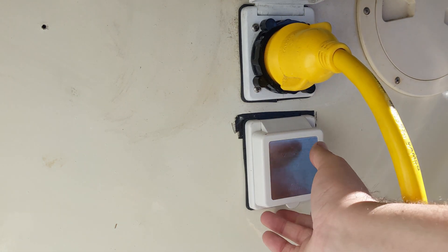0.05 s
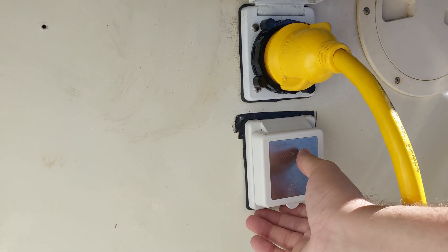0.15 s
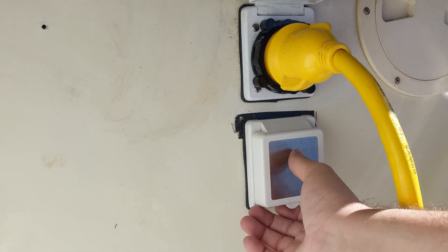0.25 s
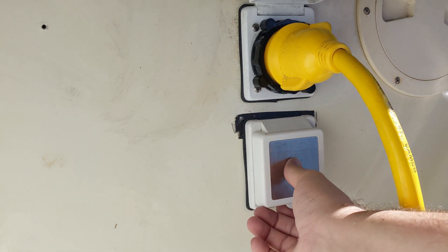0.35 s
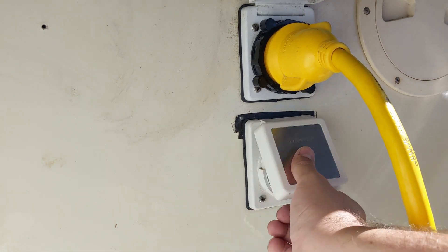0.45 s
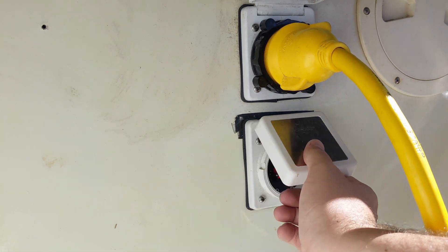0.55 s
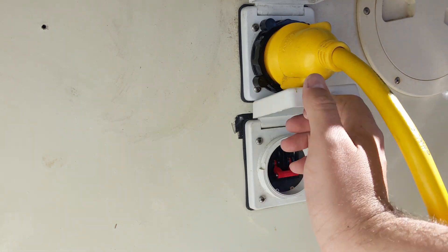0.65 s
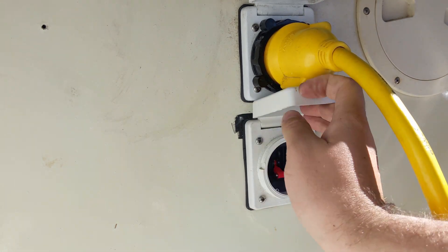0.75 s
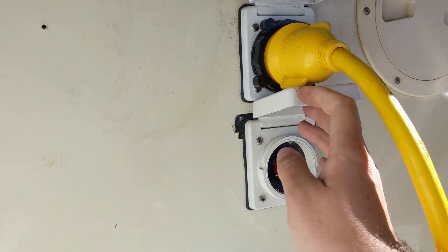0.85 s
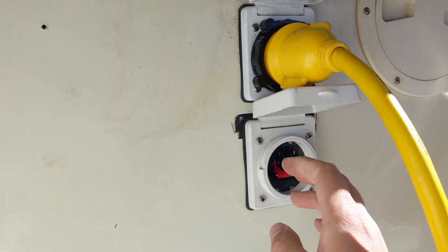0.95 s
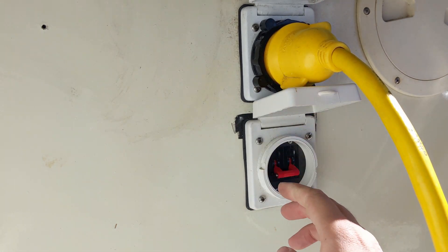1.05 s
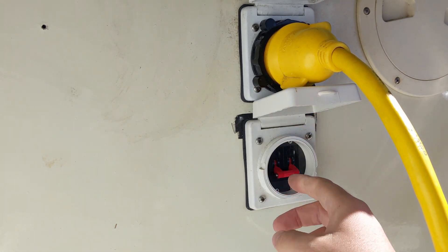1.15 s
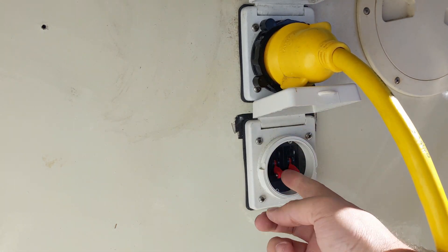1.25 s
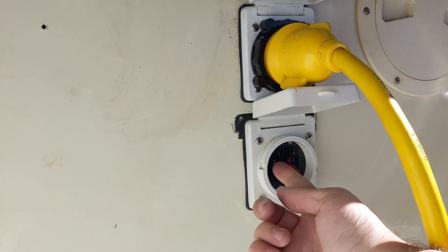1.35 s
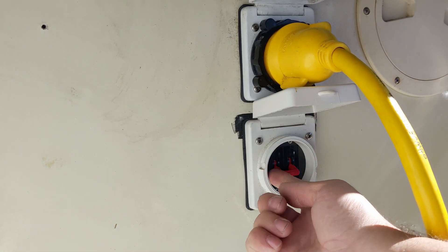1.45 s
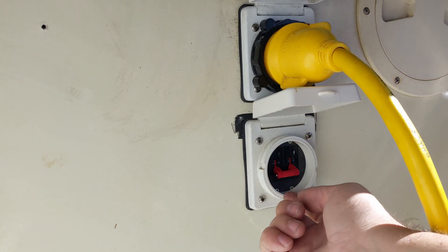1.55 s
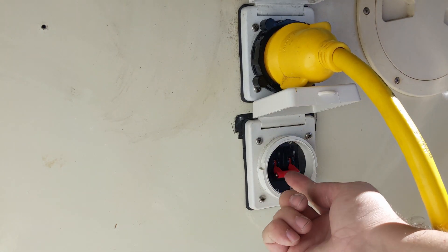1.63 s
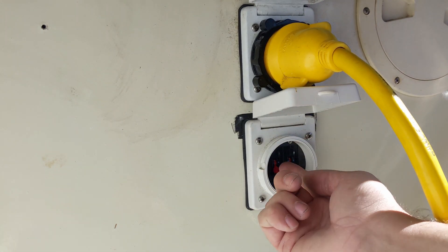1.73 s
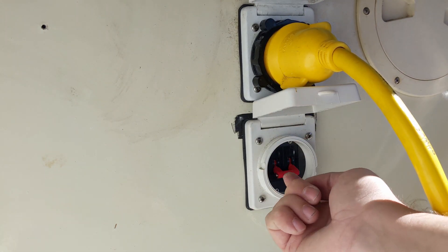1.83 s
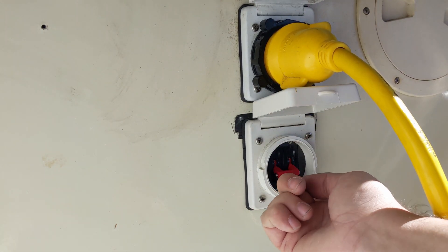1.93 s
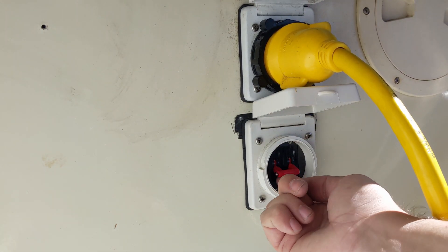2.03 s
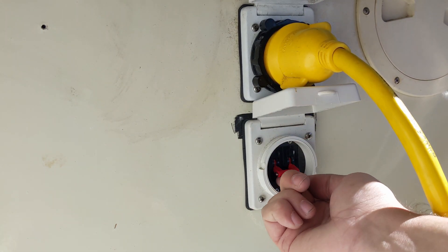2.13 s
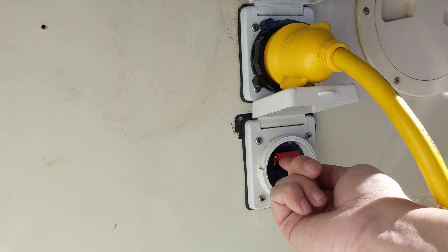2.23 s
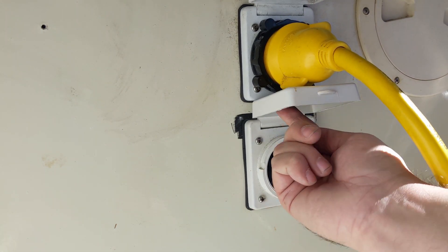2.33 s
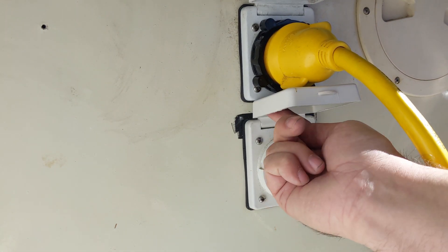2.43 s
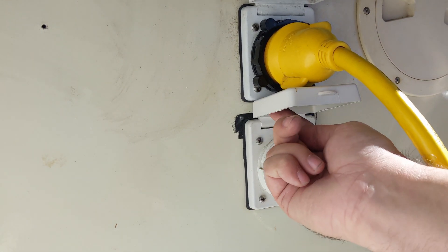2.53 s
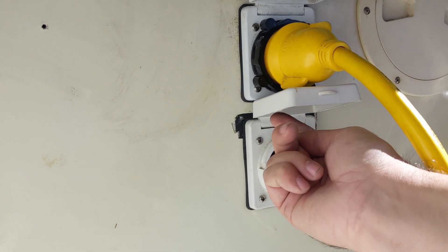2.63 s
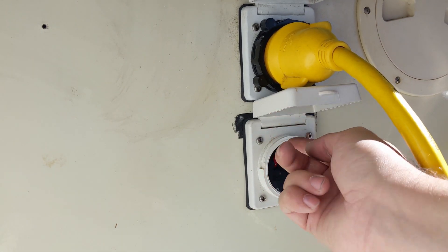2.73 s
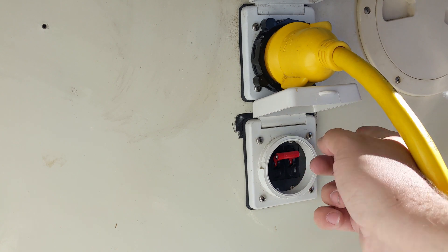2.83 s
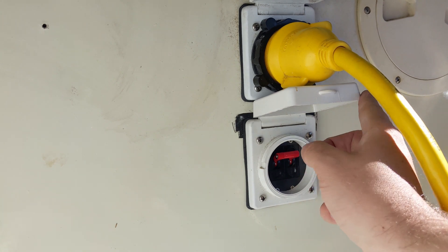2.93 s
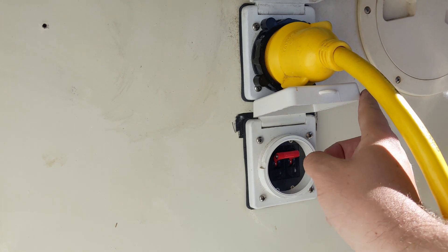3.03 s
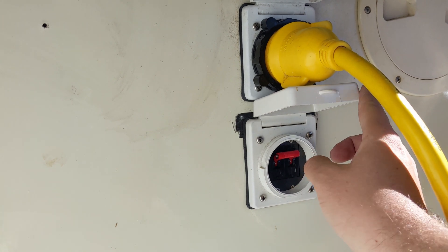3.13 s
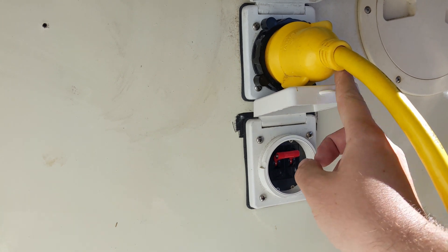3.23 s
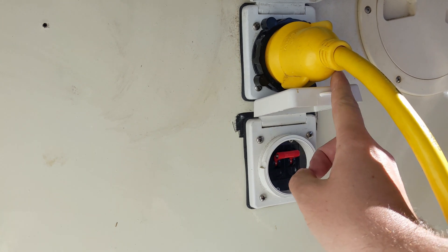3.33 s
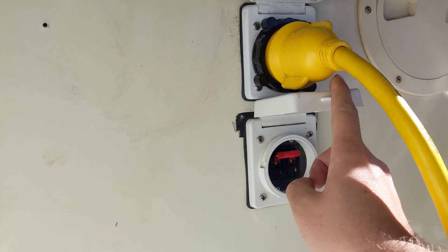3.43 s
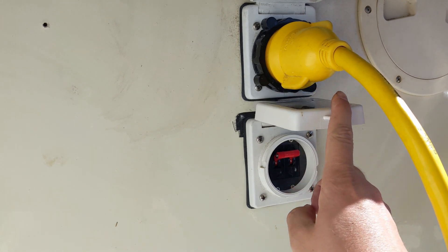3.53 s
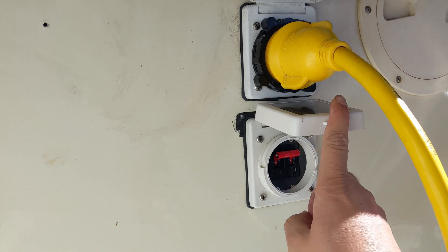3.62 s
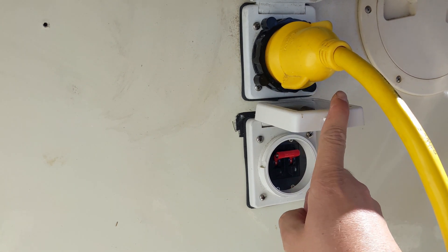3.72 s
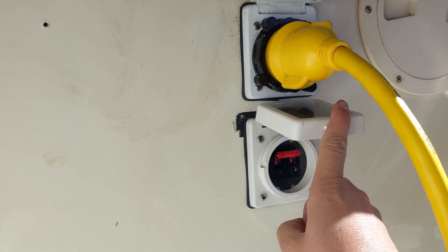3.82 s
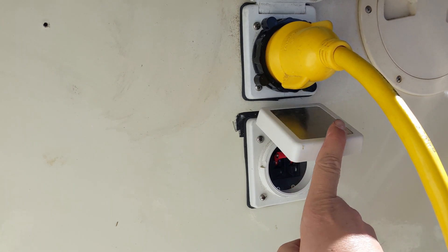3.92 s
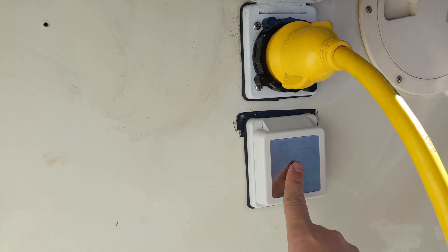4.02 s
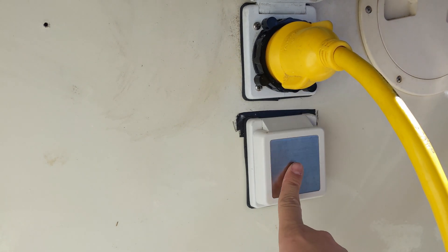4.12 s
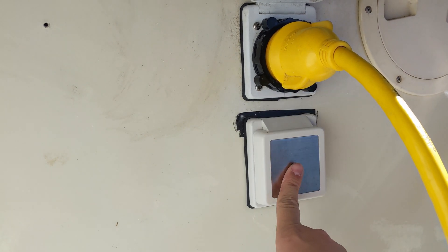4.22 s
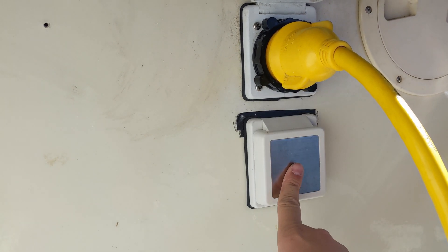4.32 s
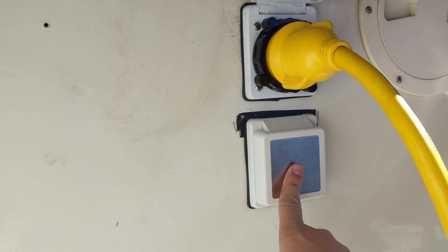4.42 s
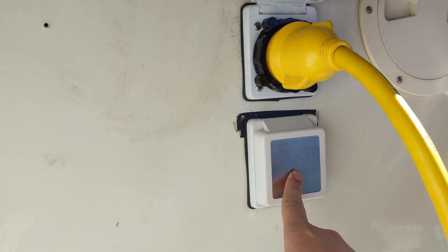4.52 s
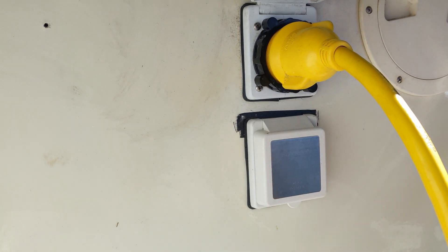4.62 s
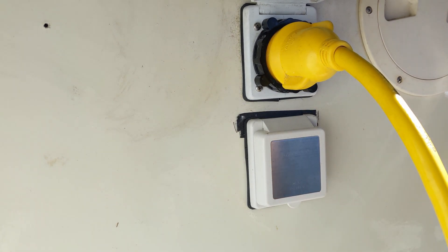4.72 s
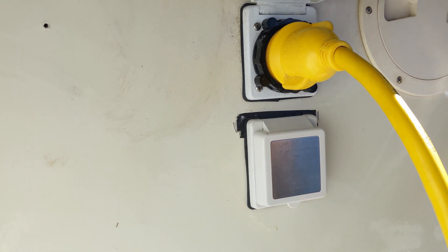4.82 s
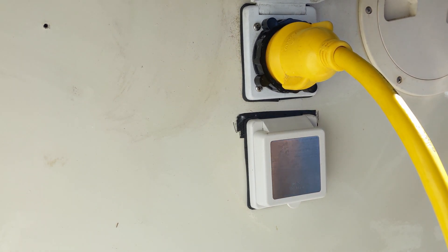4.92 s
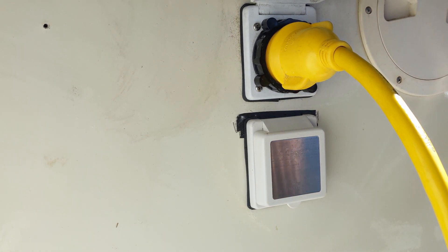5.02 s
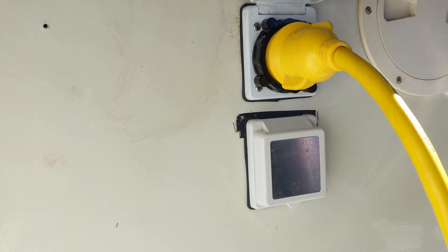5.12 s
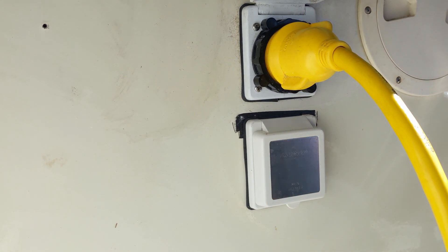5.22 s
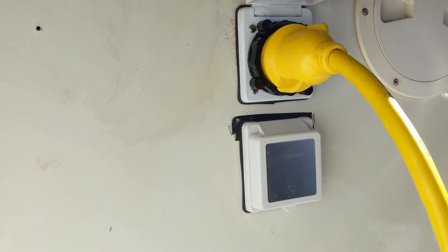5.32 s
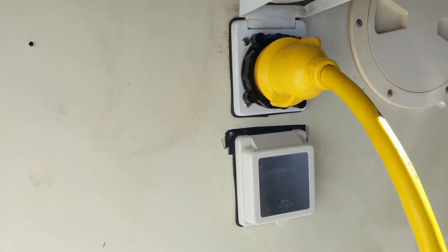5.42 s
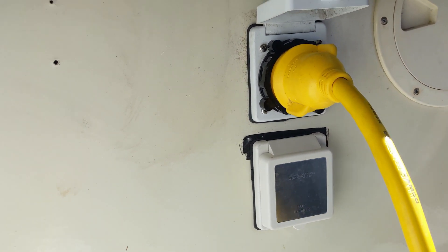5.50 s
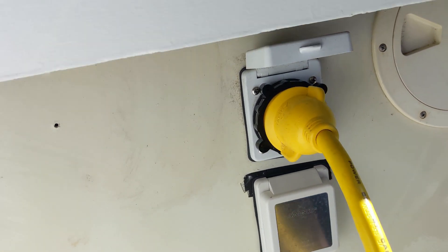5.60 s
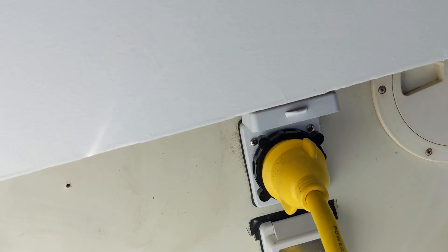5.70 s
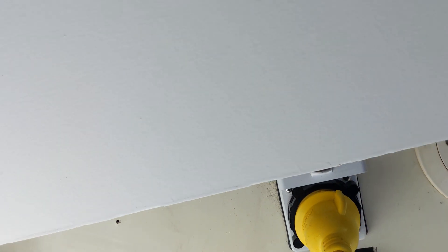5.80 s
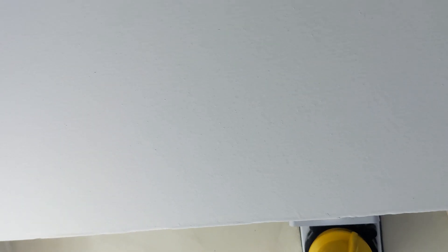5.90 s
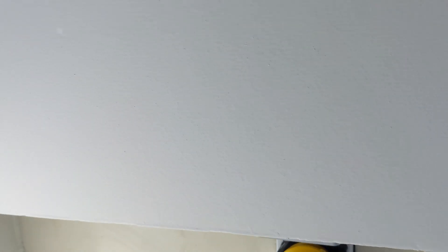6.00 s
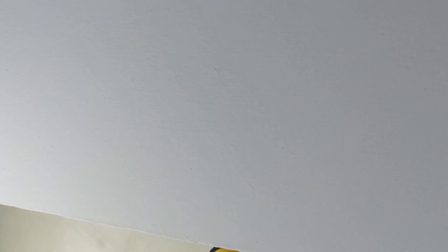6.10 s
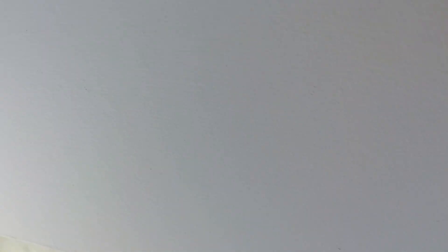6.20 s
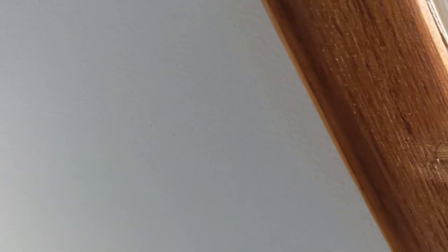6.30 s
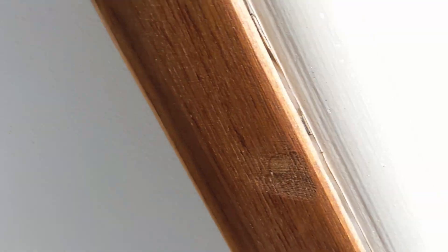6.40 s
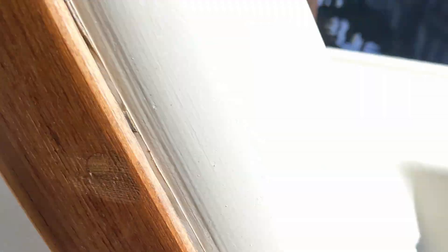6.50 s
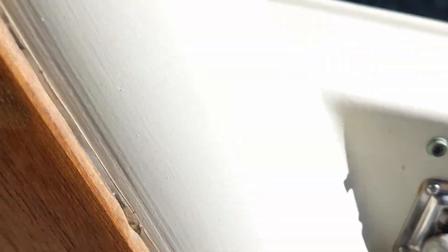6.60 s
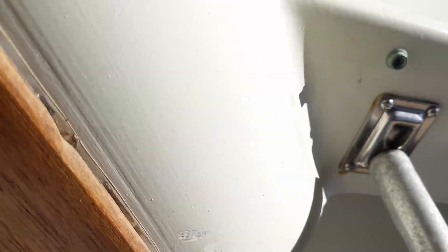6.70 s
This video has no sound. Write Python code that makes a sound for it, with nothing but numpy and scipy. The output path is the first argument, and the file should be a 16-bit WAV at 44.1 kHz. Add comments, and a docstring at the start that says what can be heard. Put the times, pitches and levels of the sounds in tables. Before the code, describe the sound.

A sprung plastic lid squeaks and clacks open on a hollow boat wall, a switch snaps, the lid claps shut, then cloth rustles.

```python
"""Fingers touch the sprung plastic lid of a power inlet on a boat; its hinge squeaks and it clacks as it flips up.
After a pause the switch inside snaps, and later the lid claps shut; fingers tap and scrape in between.
Each blow clicks in the plastic and drums on the hollow fibreglass wall through shared ringing modes.
Faint whistles, probably a bird, follow; then shaped noise makes clothes rustle and soft bumps land
as the person gets up. Wall rumble and quiet air lie under everything, in close phone stereo."""
import sys
import numpy as np
from scipy import signal
from scipy.fft import rfft, irfft, next_fast_len
from scipy.io import wavfile
from scipy.ndimage import uniform_filter1d, minimum_filter1d

SR = 44100
rng = np.random.default_rng(int(sys.argv[2]) if len(sys.argv) > 2 else 0)


def persist_wave(psi):
    """Save psi, clipped to +-1, as 16-bit WAV."""
    counts = np.round(np.clip(psi, -1, 1) * 32767).astype(np.int16)
    wavfile.write(sys.argv[1], SR, np.atleast_2d(counts).T)


N = 297675

# How boom, thud, ring, clack, click and tick build up and die:
# low f/Hz, high f/Hz, rise/s, first crack level/dB, early t60/s, tail level/dB, tail t60/s,
# dense ring level/dB, gain/dB
BLOW_REGISTERS = [(56.48, 170, 0.018, -27.5, 0.6, -21.5, 0.85, -5.5, 3),
                  (144, 400, 0.0047, -32, 0.39, -24, 0.55, -7.5, -2),
                  (384.5, 700, 0.0051, -14, 0.34, -13.5, .48, -9, -3),
                  (698.6, 3000, 0.0028, 3, 0.046, -20, 0.33, 5.5, 3),
                  (3000, 8000, .0018, 9, 0.088, -13, 0.23, 1.5, 0),
                  (7850, 15000, .0018, 7.5, 0.055, -12, 0.14, 4, 3)]
# Modes of the wall and the inlet on it:
# f/Hz, level/dB, t60/s, left minus right/dB, phase between the microphones/rad
WALL_MODES = [(88.7, 4, 0.16, 1, -0.5), (90.6, -5, 0.2, 1.5, -1.5), (116.5, -1, 0.36, 1.5, -1),
              (166.6, -7, .3, 3, -5), (175, -9, 0.48, -4.5, -2.97), (200.4, -1, .28, 1, -1),
              (234.7, -3.5, 0.29, -4, -1), (258.5, -6.5, 0.39, -1.5, -1), (294.6, 3, 0.21, 1.5, 1.38),
              (345, -10.5, .25, 1, 4), (380.2, -8.5, .38, -4.5, -0.5), (414, -12, 0.19, -4.5, 1.5),
              (459.4, -11, 0.18, -2, -0.5), (491.2, -8.5, 0.28, -0.5, .5), (522.4, 0, .28, -4.5, 1.5),
              (577, -7.5, 0.22, 2, 0.5), (688, -11, 0.16, 5, 1.2), (834, -10, 0.27, 0, 1.5),
              (1060, -9, 0.15, -6, 2), (1194, -9, 0.12, 4, -1), (1327, -10, .17, -3, 1),
              (1421.5, -14.5, 0.11, 1.5, 0), (1765, -14, 0.096, 2, 1), (2270, -19, .2, 0.5, 1.2),
              (2430, -19.5, 0.2, -1, 2), (2630, -13, 0.048, 6.5, 3), (3480, -13.5, 0.058, -3, 0),
              (4450, -11.5, .11, 0, 0.5), (5020, -15.5, .15, -2, 5.8)]
# Dense ring of the plastic, also the colour of the scrapes: f/Hz, relative level/dB per Hz
PLASTIC_COLOUR = [(60, -3.5), (550, 5.5), (880, -5.5), (1130, 0.5), (1450, -4.5), (1700, -5.5),
                  (2000, -3.5), (2450, -5.5), (3500, -9.5), (4500, -7), (5700, -13.5), (7000, -11),
                  (8600, -16), (13000, -14), (16000, -16)]


def knocks(blows, spot_width=0.08, scatter_db=1.5, crack_t60=0.013):
    """Each blow rings the same modes; the plastic answers at once, the heavy wall swells late and lasts."""
    t = np.arange(SR * 2 // 3) / SR
    hz, mode_db, t60, side_db, lag = np.transpose(WALL_MODES)
    rings = []
    for f, decay_s, side, phase in zip(hz, t60, side_db, lag):
        stereo_phase = np.array([[phase], [-phase]]) / 2
        rings.append(pan(side) * fade(t, decay_s) * np.exp(1j * (2 * np.pi * f * t + stereo_phase)))
    rings = np.array(rings)
    dense = ripple(colour(noise(N), PLASTIC_COLOUR), depth_db=5.0, spacing_hz=44.39)
    starts = rng.integers(0, N - len(t), len(blows))

    # every place of contact shares the blow out among the modes in its own way
    shares = undb(mode_db + scatter_db * rng.standard_normal((len(blows), len(hz))))
    shares = shares * np.exp(2j * np.pi * rng.random((len(blows), len(hz))))

    out = np.zeros((2, N))
    for k, register in enumerate(BLOW_REGISTERS):
        lo_hz, hi_hz, rise, crack_db, early_t60, tail_db, tail_t60, dense_db, gain_db = register
        inside = (hz >= lo_hz) & (hz < hi_hz)
        own_rings = rings[inside]
        wash = unit(band(dense, lo_hz, hi_hz, order=4)) * undb(dense_db)
        crack = undb(crack_db) * fade(t, crack_t60)
        decay = crack + np.hypot(fade(t, early_t60), undb(tail_db) * fade(t, tail_t60))
        swell = 1 - np.exp(-(t / rise) ** 2)
        for blow, start, share in zip(blows, starts, shares):
            s, *levels_db, spot_hz, spot_db, damping, pan_db = blow
            ringing = np.tensordot(share[inside], own_rings, axes=1).imag
            x = swell * (ringing + decay * wash[:, start:start + len(t)])
            if lo_hz <= spot_hz < hi_hz:  # the struck spot resonates at its own pitch
                spot = band(x, spot_hz * (1 - spot_width), spot_hz * (1 + spot_width), order=1)
                x = x + (undb(spot_db) - 1) * spot
            x = x * undb(-damping * t)  # a finger left on the lid chokes the ring
            add(out, s, unit_peak(x) * undb(levels_db[k] + gain_db) * pan(pan_db / 2))
    return out


# Plastic striking plastic (latch, hinge, switch, lid); levels are before the register gains:
# t/s, wall thud level/dB, housing ring level/dB, struck part clack level/dB, edge click level/dB,
# struck spot f/Hz, its resonance/dB, damping by the hand/(dB/s), left minus right/dB (half is applied)
PLASTIC_CLACKS = [(0.478, -14, -5, -28.5, -36, 501, 24, 26.5, -4),
                  (0.675, -24, -35, -49, -39, 231, 15, 248, -4.5),
                  (0.718, -12, -20.5, -28.5, -30, 313, 22, 59, -2.5),
                  (0.738, -10, -24.5, -31, -30.5, 212, 6, 47, -3),
                  (2.28, -52, -32.5, -35.5, -33, 590, 2, 22, 0),
                  (2.291, -39, -15.5, -19, -24.5, 570, 1.5, 27, -3),
                  (2.351, -28.5, -22.5, -35.5, -36, 491, 9, 42, -4),
                  (2.4, -23, -30, -36, -38, 195, 8.5, 75, -6),
                  (2.438, -34.5, -55, -63, -47.5, 198, 2.5, 4, -2),
                  (4.042, -17, -13.5, -16, -16.5, 303.5, 6.5, 11.5, 3)]


def clacks():
    """Latch, hinge, switch and lid strike hard, plastic on plastic."""
    return [hard_blow(*row) for row in PLASTIC_CLACKS]


# the deep boom follows the thud but builds slowly, so the hand chokes it first
BOOM_DB, BOOM_BUILD_S = -14.5, .04


def hard_blow(s, thud, ring, clack, click, hz, spot_db, damping, pan_db):
    """Plastic on plastic reaches from the boom of the wall to the finest tick."""
    boom = thud + BOOM_DB - BOOM_BUILD_S * damping
    return s, boom, thud, ring, clack, click, tick(click, hz), hz, spot_db, damping, pan_db


# the tick follows the click; small, high-pitched parts tick brighter
TICK_EVEN_HZ, TICK_DB_PER_OCTAVE = 470, 4.5


def tick(click_db, hz):
    """Level of the topmost treble for a spot of this pitch."""
    return click_db + TICK_DB_PER_OCTAVE * np.log2(hz / TICK_EVEN_HZ)


# Soft fingers landing on lid and socket; levels are before the register gains:
# t/s, level/dB, spot f/Hz, nail click level/dB, damping/(dB/s)
FINGER_TOUCHES = [(0.056, -41.5, 243, -54, 36.5), (0.113, -61, 221, -66, 17), (0.22, -35.5, 188, -51.5, 40),
                  (0.324, -38.5, 160, -62, 59.5), (0.776, -50, 191, -49, 21),
                  (0.895, -43.5, 231, -57.5, 16), (1.355, -57.5, 380, -71.5, 25),
                  (1.489, -57, 403, -64, 13), (1.625, -46.5, 210, -62, 7), (1.777, -48, 440, -55, 7),
                  (1.999, -74, 540, -55.5, 27), (2.024, -47.5, 175, -66.5, 91),
                  (2.967, -35.5, 300, -57, 90), (2.984, -33.5, 206, -76, 64), (3.189, -52, 391, -63.5, 20),
                  (3.659, -48, 229.7, -72.5, 250.5), (3.907, -42, 217, -67.5, 397.5),
                  (3.961, -47, 185, -77, 19.5), (4.003, -31, 204.2, -58, 250),
                  (4.487, -61.5, 149.5, -70.5, 15.5)]
TOUCH_PAN_DB = -4  # left minus right, of which half is applied


def touches():
    """Fingertips thud softly on the plastic while the nail adds a small click."""
    return [soft_blow(*row, TOUCH_PAN_DB) for row in FINGER_TOUCHES]


# Dull bumps as the person gets up; levels are before the register gains:
# t/s, level/dB, f/Hz, damping/(dB/s), left minus right/dB (half is applied)
BODY_BUMPS = [(5.322, -44.5, 397, 110.5, 2), (5.548, -56, 450, 200, 8), (5.919, -39.5, 403, 85, 1),
              (6.48, -51.5, 180, 23, -7.5), (6.582, -43.5, 414, 18.5, -6), (6.625, -48.5, 155, 20.5, -6),
              (6.684, -47.5, 317, 10, -3)]
BUMP_CLICK_DB = -19.5  # click relative to the bump


def bumps():
    """Soft bumps drive the wall with only a little click."""
    return [soft_blow(s, db, hz, db + BUMP_CLICK_DB, damping, pan_db)
            for s, db, hz, damping, pan_db in BODY_BUMPS]


# Centres of boom, thud and ring under a soft blow: f/Hz
SOFT_REGISTER_CENTRES = (89.26, 227, 560)
SOFT_FALL_DB_PER_OCTAVE, SOFT_BOOM_DB, SOFT_RESONANCE_DB = 8.5, -0.5, 13
# the clack lies between ring and click
CLACK_RING_SHARE, CLACK_DB = 0.3, -1.5


def soft_blow(s, db, hz, click_db, damping, pan_db):
    """Flesh and cloth move the wall mostly near the pitch of the spot that they touch."""
    octaves = np.abs(np.log2(hz / np.array(SOFT_REGISTER_CENTRES)))
    boom, thud, ring = db - SOFT_FALL_DB_PER_OCTAVE * (octaves - octaves.min())
    boom = boom + SOFT_BOOM_DB - BOOM_BUILD_S * damping
    clack = click_db + CLACK_RING_SHARE * (ring - click_db) + CLACK_DB
    top = tick(click_db, hz)
    return s, boom, thud, ring, clack, click_db, top, hz, SOFT_RESONANCE_DB, damping, pan_db


# Fingers and switch sliding on plastic: start t/s, end t/s, level/dB
PLASTIC_SCRAPES = [(0.177, 0.254, -48.5), (0.269, 0.329, -55.5), (0.469, 0.507, -46), (0.676, 0.702, -36),
                   (0.76, 0.789, -41.5), (0.837, 0.955, -54.5), (1.517, 1.591, -63.5), (1.631, 1.671, -57),
                   (2.272, 2.29, -31), (2.372, 2.377, -30), (3.178, 3.211, -60), (3.893, 3.921, -57),
                   (3.974, 4.015, -55), (4.008, 4.047, -42.5)]
# The hinge squeaking as the lid is prised up: start t/s, end t/s, level/dB
HINGE_SQUEAKS = [(0.0, 0.066, -65), (0.25, 0.314, -47), (0.471, 0.486, -31.5)]
SQUEAK_HZ, SQUEAK_WIDTH_HZ = 3020, 280


def scrapes(grain_db=4, grip_db=0.5, edge_s=0.023):
    """Dense tiny slips rasp in the plastic as the grip comes and goes; the hinge picks out one resonance."""
    grip = unit(uniform_filter1d(rng.standard_normal(N), size=500))
    grains = np.repeat(rng.standard_normal(N // 40 + 1), 40)[:N]  # each about a millisecond long
    slips = noise(N) * undb(grip_db * grip + grain_db * grains)
    rasp = band(colour(slips, PLASTIC_COLOUR), 2600, 17000, order=1)
    rasp = ripple(rasp, depth_db=7.5, spacing_hz=62.0)
    half_width = SQUEAK_WIDTH_HZ / 2
    squeak = unit(band(slips, SQUEAK_HZ - half_width, SQUEAK_HZ + half_width, order=1))

    out = np.zeros((2, N))
    for sound, rows in [(rasp, PLASTIC_SCRAPES), (squeak, HINGE_SQUEAKS)]:
        for start, end, db in rows:
            i = np.arange(max(int(start * SR), 0), int(end * SR) + SR // 10)
            t = i / SR
            contact = np.clip((t - start) / edge_s, 0, 1) * fade(np.maximum(t - end, 0), 0.059)
            add(out, start, contact * undb(db) * sound[:, i])
    return out


# The sleeve swishing with each reach of the arm: peak t/s, dying time/s, level/dB before the trim
SLEEVE_SWISHES = [(0.25, .6, -58), (0.8, .35, -59.5), (2.35, .6, -72.5), (4.09, .2, -61.5),
                  (4.88, .65, -52)]
# Hiss of the sleeve cloth: f/Hz, relative level/dB per Hz
SLEEVE_COLOUR = [(500, -29), (1230, -5.5), (1600, -10.5), (2300, -5.5), (3000, -6.5), (4300, -3.5),
                 (5700, -11), (6800, -3), (8300, -8.5), (10500, -9.5), (12300, -2.5), (14500, -5.5),
                 (16000, -12.5)]


def sleeve(trim_db=-1):
    """Fibres sliding over each other hiss with each reach."""
    hiss = ripple(colour(noise(N), SLEEVE_COLOUR), depth_db=3.0, spacing_hz=78.23)
    return hiss * undb(trim_db) * swishes(SLEEVE_SWISHES)


# Shirt strokes as the person rises:
# peak t/s, dying time/s, hiss level/dB before the trim, heavy cloth drag level/dB
SHIRT_STROKES = [(5.732, 0.11, -47, -43.5), (5.86, 0.18, -52, -46.5), (5.958, .06, -48, -42.5),
                 (6.3, 0.045, -53.5, -74), (6.628, 0.016, -44, -66), (6.688, 0.036, -49, -64)]
# Hiss of the shirt: f/Hz, relative level/dB per Hz
SHIRT_HISS_COLOUR = [(470, -42), (800, -6), (1270, -2), (1540, -7.5), (2290, -1.5), (2630, -4),
                     (7170, -4.5), (10600, -7.5), (13600, -3), (16000, -9.5)]
# Drag of heavy cloth: f/Hz, relative level/dB per Hz
CLOTH_DRAG_COLOUR = [(150, -31), (250, -10.5), (378, -8.5), (626, -0.5), (945, -5), (1250, 0.5),
                     (1570, -16), (2300, -10.5), (2670, -17.5), (6000, -33), (7800, -52.5), (13200, -120)]
# between strokes the cloth keeps sliding (the hiss level is before the trim)
RISING_FROM_S, RISING_FADE_S, SLIDE_HISS_DB, SLIDE_DRAG_DB = 5.194, 0.42, -56, -71


def shirt(hiss_trim_db=-1, grain_db=1.0):
    """Shirt fibres hiss as they slide; heavier cloth drags lower and rougher."""
    fibres = undb(grain_db * unit(uniform_filter1d(rng.standard_normal(N), size=200)))
    hiss = colour(noise(N) * fibres, SHIRT_HISS_COLOUR)
    drag = colour(noise(N) * fibres, CLOTH_DRAG_COLOUR)
    rising = np.clip((np.arange(N) / SR - RISING_FROM_S) / RISING_FADE_S, 0, 1)
    hiss_strokes = swishes([(s, length, db) for s, length, db, _ in SHIRT_STROKES])
    drag_strokes = swishes([(s, length, db) for s, length, _, db in SHIRT_STROKES])
    hiss_gain = np.hypot(hiss_strokes, rising * undb(SLIDE_HISS_DB))
    drag_gain = np.hypot(drag_strokes, rising * undb(SLIDE_DRAG_DB))
    return hiss * undb(hiss_trim_db) * hiss_gain + drag * drag_gain


SWISH_RISE_SHARE = .38  # build-up of a swish as a share of its dying time


def swishes(rows):
    """Gain of cloth strokes (peak s, dying time s, dB): each gathers speed quickly and runs out slowly."""
    t = np.arange(N) / SR
    power = np.zeros(N)
    for s, length, db in rows:
        u = (t - s) / length
        exponent = np.where(u < 0, (u / SWISH_RISE_SHARE) ** 2, u)
        power += (undb(db) * np.exp(-np.minimum(exponent, 20))) ** 2
    return np.sqrt(power)


# Faint far whistles, probably a bird: start t/s, length/s, f/Hz, level/dB
BIRD_WHISTLES = [(4.37, 0.12, 4005, -77), (4.67, 0.098, 3910, -76), (5.41, .08, 4570, -70.5)]


def whistles(waver=0.0085):
    """Thin, faint sine notes waver slightly in pitch."""
    out = np.zeros((2, N))
    drift = 1 + waver * unit(uniform_filter1d(rng.standard_normal(N), size=300))
    for s, length, hz, db in BIRD_WHISTLES:
        size = int(length * SR)
        tone = np.sin(2 * np.pi * np.cumsum(hz * drift[:size]) / SR)
        note = unit(np.hanning(size) ** .5 * tone)
        add(out, s, pan(0) * undb(db) * note)
    return out


# The hand leaning on the wall: t/s, rumble level/dB
HAND_LEAN = [(0, -54.5), (.9, -56.5), (1.15, -67), (2.2, -74.5), (3.2, -70.5), (3.55, -77.5), (4.3, -59.5),
             (4.65, -69), (6.3, -65), (6.75, -55.5)]
# Wall rumble: f/Hz, relative level/dB per Hz
RUMBLE_COLOUR = [(40, -17.5), (80, -2.5), (170, -4), (310, -10), (520, -9.5), (800, -17.5), (2000, -46)]


def wall_rumble():
    """The wall rumbles under the leaning hand."""
    return colour(noise(N), RUMBLE_COLOUR) * curve(HAND_LEAN)


# Quiet air: f/Hz, relative level/dB per Hz
STILL_AIR_COLOUR = [(18, -51), (30, -15.5), (109, 0), (404, -12.5), (499, -7.5), (760, -18), (1390, -9.5),
                    (1860, -18.5), (2230, -8.5), (2410, -13), (5310, -17.5), (7270, -15), (10800, -19.5),
                    (14400, -15), (16000, -16.5)]


def still_air(level_db=-69):
    """Still outdoor air is a steady, faint noise."""
    return colour(noise(N), STILL_AIR_COLOUR) * undb(level_db)


# Likeness of the two microphones: f/Hz, coherence
MIC_LIKENESS = [(130, 0.98), (300, 0.35), (640, 0.84), (1400, 0.0)]


def noise(size):
    """Stereo noise: alike in the bass, unrelated in the high treble."""
    fast = next_fast_len(size)
    mid, side = rfft(rng.standard_normal((2, fast)))
    alike = np.clip(over_hz(MIC_LIKENESS, np.arange(len(mid)) * SR / fast), -1, 1)
    mid, side = mid * np.sqrt(1 + alike), side * np.sqrt(1 - alike)
    return irfft(np.array([mid + side, mid - side]), fast)[:, :size]


def ripple(x, depth_db, spacing_hz):
    """Crowded resonances and near surfaces give each microphone its own peaks and dips."""
    size = next_fast_len(x.shape[1])
    hz = np.arange(size // 2 + 1) * SR / size
    # the peaks are spacing_hz apart at 1 kHz, wider in the treble, and flatten out in the bass
    place = np.sqrt(hz * 1000) * 2 / spacing_hz
    shared, left, right = rng.standard_normal((3, 1000))
    db = np.array([np.interp(place, np.arange(1000), shared + own) for own in (left, right)])
    db = db * depth_db / np.sqrt(2)
    return unit(irfft(rfft(x, size) * undb(db * np.minimum(hz / 1000, 1)), size)[:, :x.shape[1]])


def colour(x, points):
    """Give a sound a spectrum, at rms 1."""
    size = next_fast_len(x.shape[-1])
    hz = np.arange(size // 2 + 1) * SR / size
    return unit(irfft(rfft(x, size) * undb(over_hz(points, hz)), size)[..., :x.shape[-1]])


def over_hz(points, hz):
    """Read (Hz, value) points on a log-frequency axis."""
    f, value = np.transpose(points)
    return np.interp(np.log(hz + 1), np.log(f), value)


def curve(rows):
    """Gain at every sample from (s, dB) rows."""
    s, db = np.transpose(rows)
    return undb(np.interp(np.arange(N) / SR, s, db, left=-120, right=-120))


def band(x, lo_hz, hi_hz, order=3):
    """Causal band-pass."""
    edges = [lo_hz, min(hi_hz, SR / 2 - 1000)]
    return signal.sosfilt(signal.butter(order, edges, "band", fs=SR, output="sos"), x)


def undb(db):
    """Decibels to gain."""
    return 10 ** (np.asarray(db) / 20)


def unit(x):
    """Scale to rms 1."""
    return x / np.sqrt(np.mean(x ** 2) + 1e-20)


def unit_peak(x):
    """Scale so that the loudest 10 ms have rms 1."""
    return x / np.sqrt(uniform_filter1d(np.mean(x ** 2, axis=0), size=SR // 100).max())


def pan(db):
    """Left and right gains for a level difference."""
    return undb(np.array([[db], [-db]]) / 2)


def fade(t, t60):
    """Exponential decay by 60 dB in t60 seconds."""
    return np.exp(-np.log(1000) * t / t60)


def add(out, s, x):
    """Mix a sound in at a time."""
    i = max(int(s * SR), 0)
    out[:, i:i + x.shape[1]] += x[:, :max(N - i, 0)]


def scene():
    """Blows, scrapes, clothes, a far bird, wall rumble and air."""
    blows = clacks() + touches() + bumps()
    return knocks(blows) + scrapes() + sleeve() + shirt() + whistles() + wall_rumble() + still_air()


TOP_HZ, CEILING = 15900, .9  # treble limit; peak amplitude above which the gain dips


def record(dry):
    """The phone cuts the deep bass and the top, and eases its gain down on the loudest peaks."""
    top = signal.ellip(10, .2, 70, TOP_HZ, fs=SR, output="sos")
    low_cut = signal.butter(2, 28, "high", fs=SR, output="sos")
    lean = signal.sosfilt(top, signal.sosfilt(low_cut, dry))
    allowed = CEILING / np.maximum(np.abs(lean), CEILING)
    held = minimum_filter1d(allowed, size=SR // 200)
    gain = uniform_filter1d(held, size=SR // 200)
    return signal.sosfilt(top, lean * gain)


dry = scene()
out = record(dry)
persist_wave(out)
```